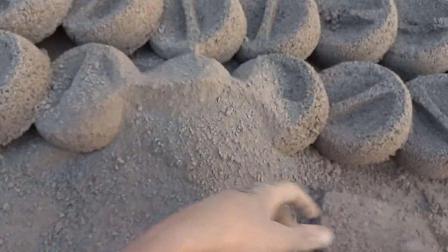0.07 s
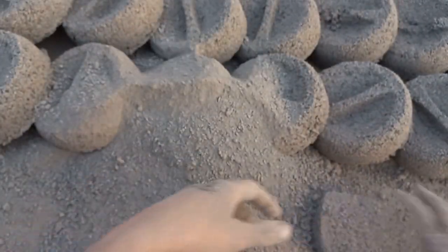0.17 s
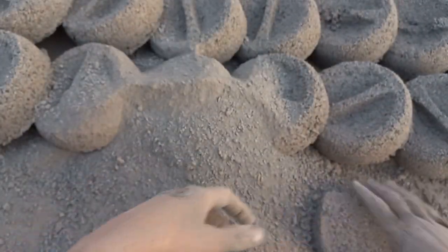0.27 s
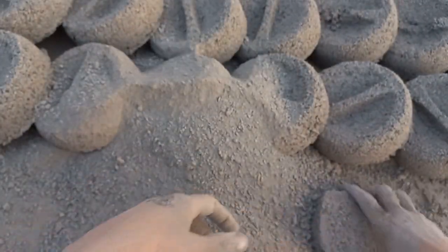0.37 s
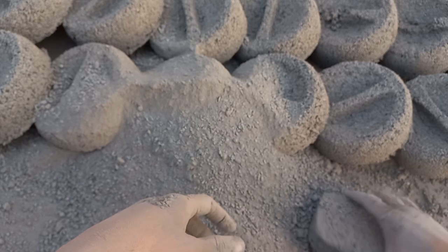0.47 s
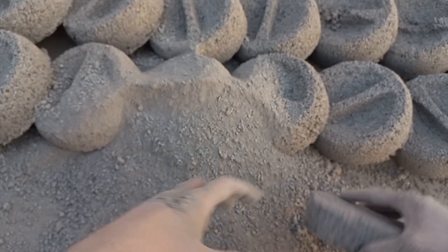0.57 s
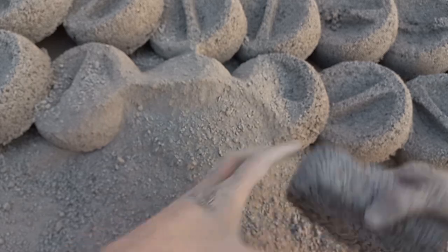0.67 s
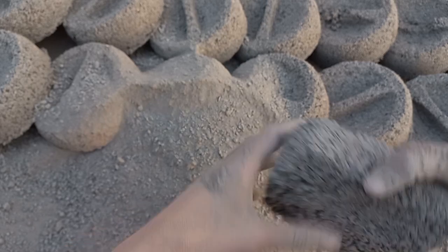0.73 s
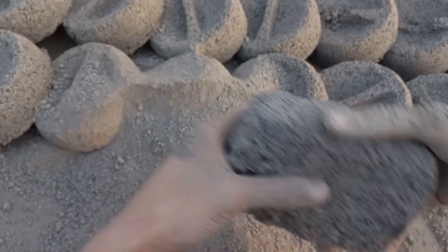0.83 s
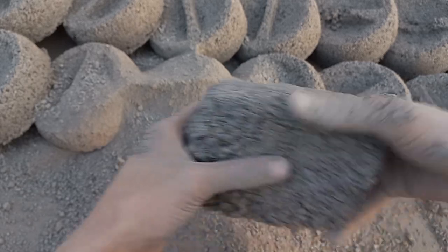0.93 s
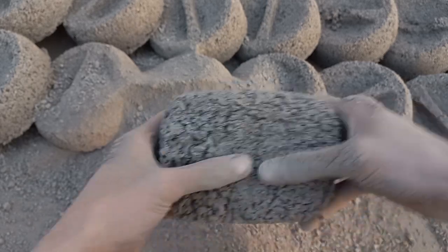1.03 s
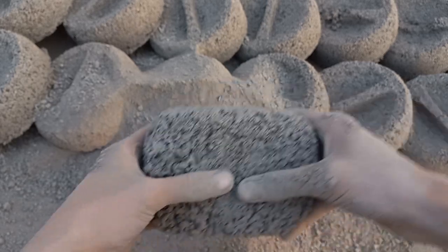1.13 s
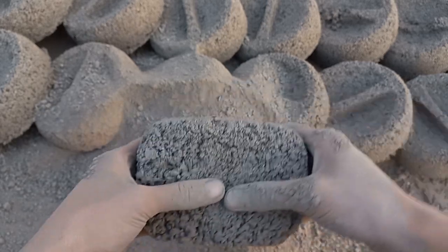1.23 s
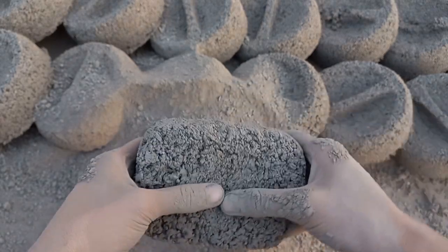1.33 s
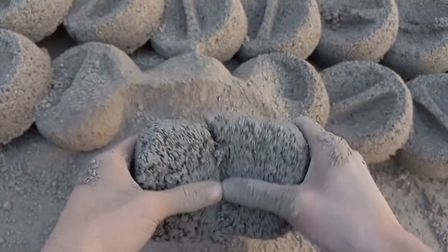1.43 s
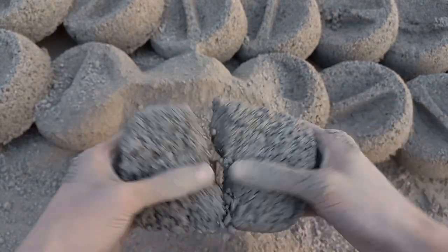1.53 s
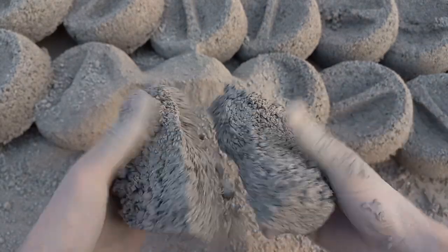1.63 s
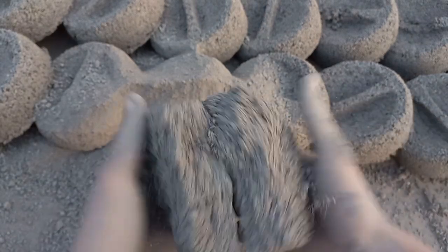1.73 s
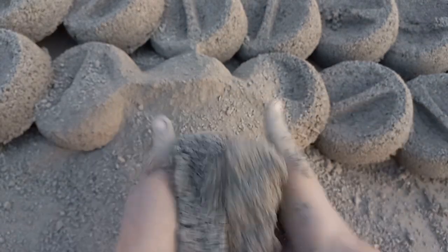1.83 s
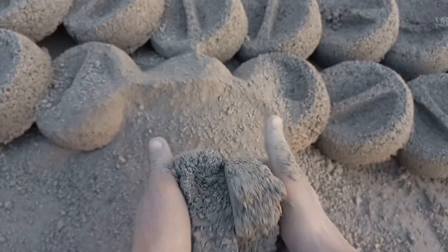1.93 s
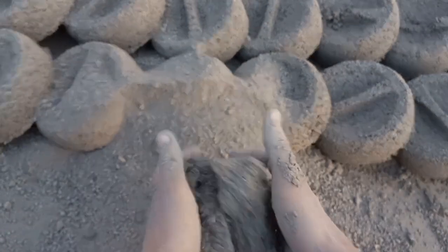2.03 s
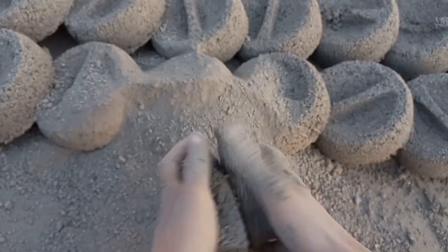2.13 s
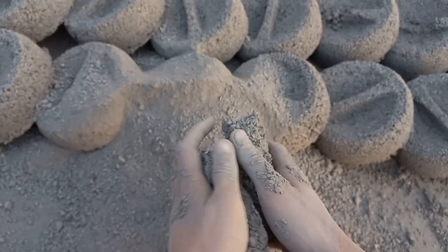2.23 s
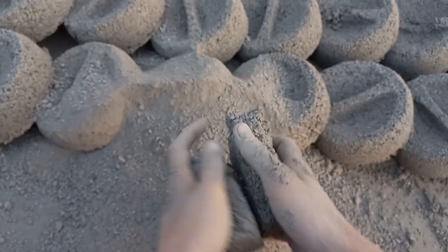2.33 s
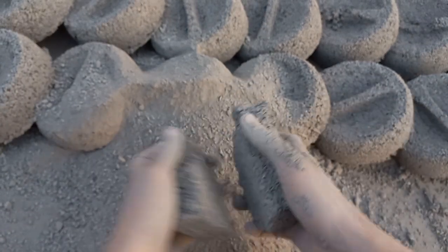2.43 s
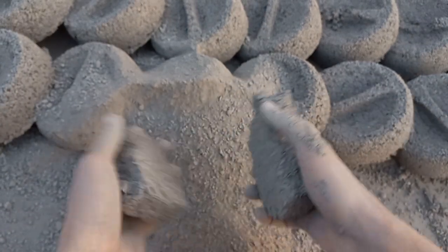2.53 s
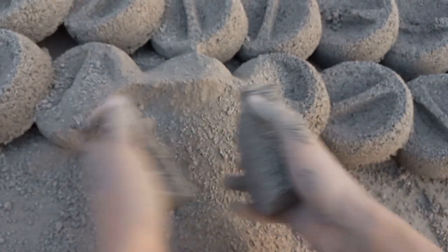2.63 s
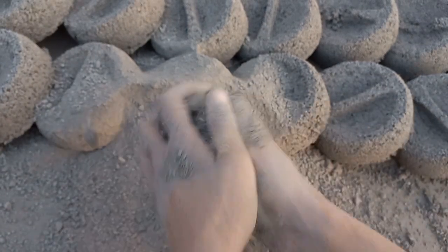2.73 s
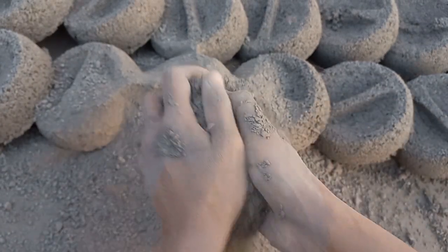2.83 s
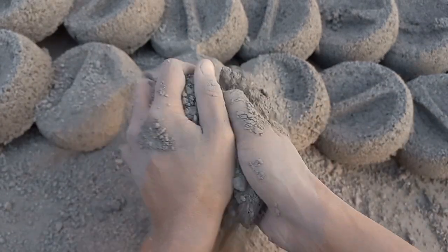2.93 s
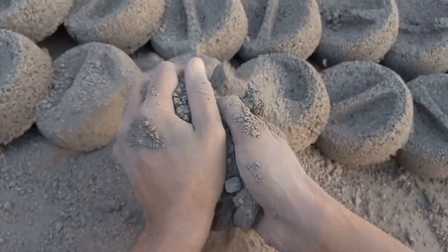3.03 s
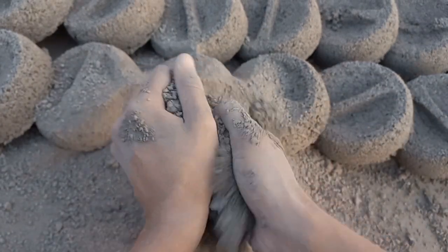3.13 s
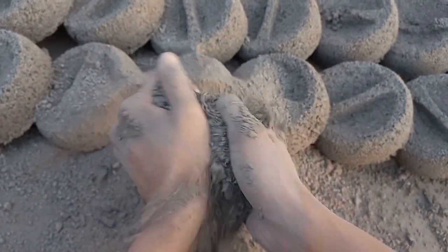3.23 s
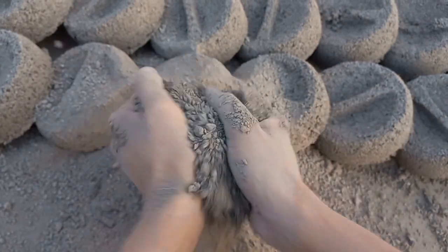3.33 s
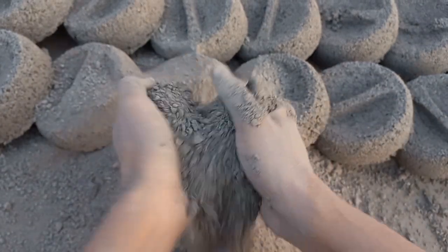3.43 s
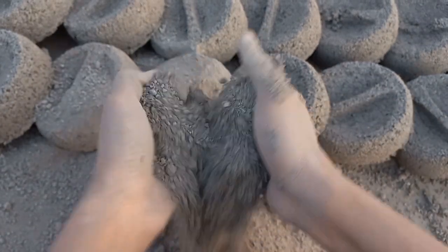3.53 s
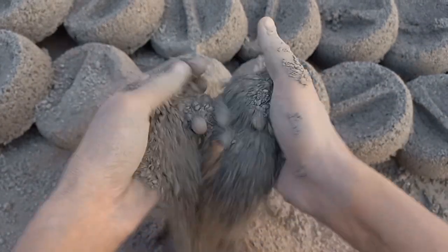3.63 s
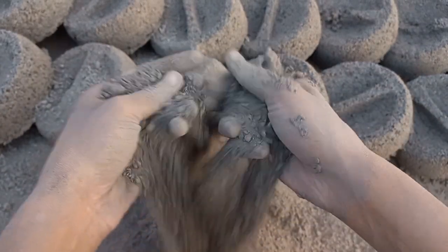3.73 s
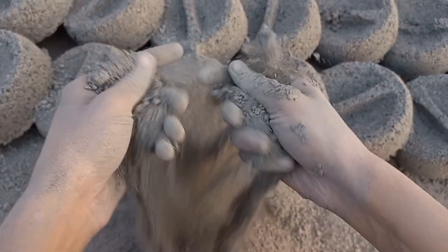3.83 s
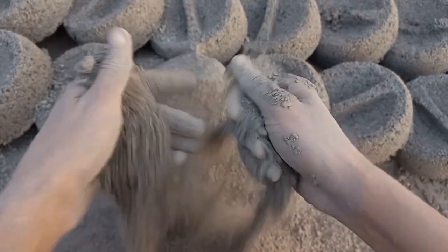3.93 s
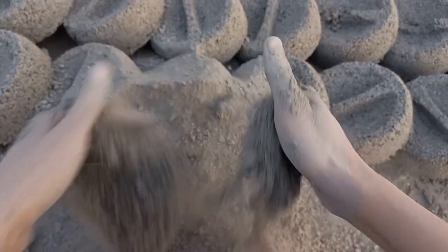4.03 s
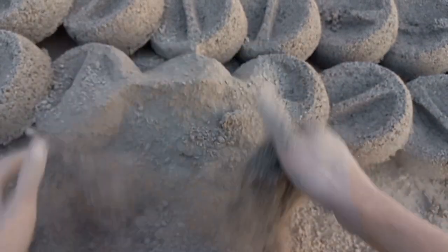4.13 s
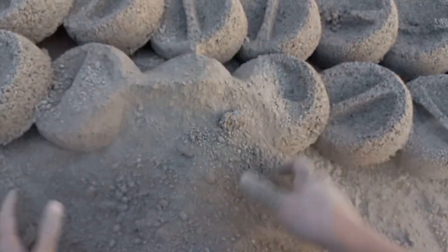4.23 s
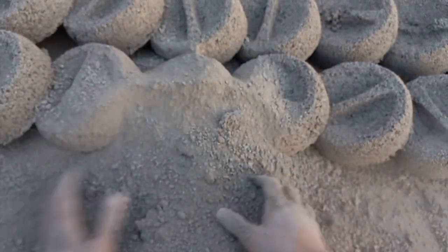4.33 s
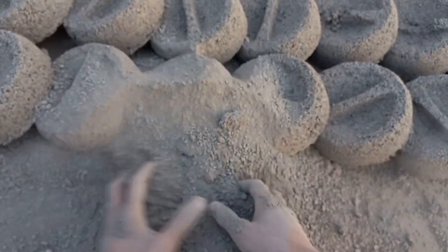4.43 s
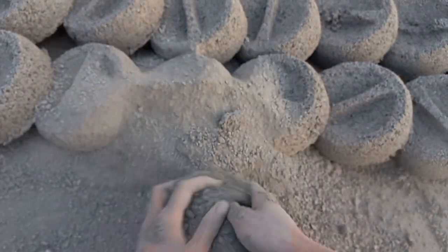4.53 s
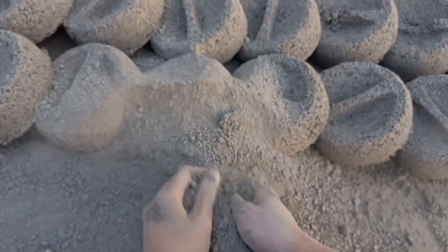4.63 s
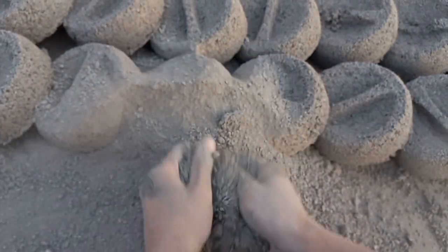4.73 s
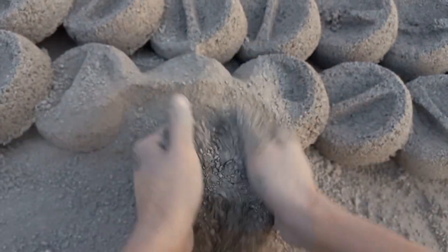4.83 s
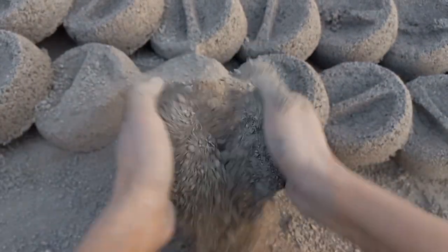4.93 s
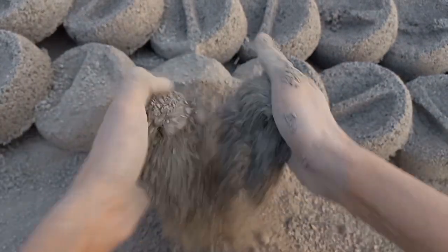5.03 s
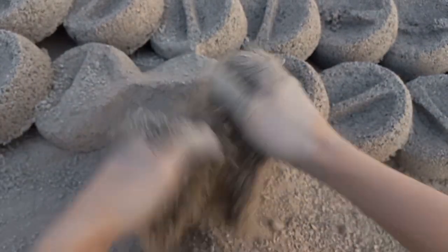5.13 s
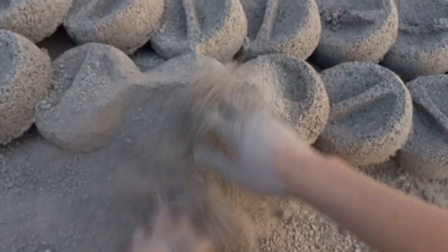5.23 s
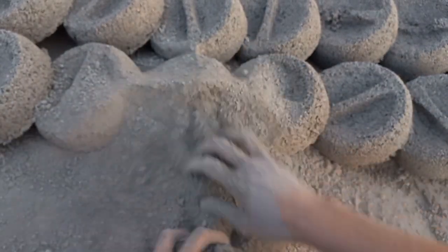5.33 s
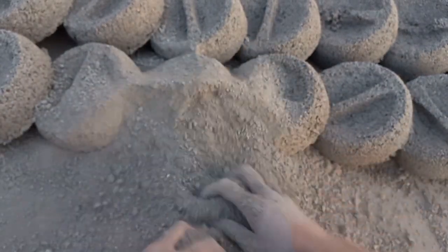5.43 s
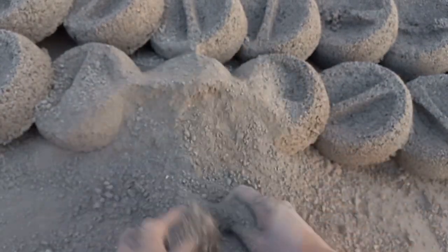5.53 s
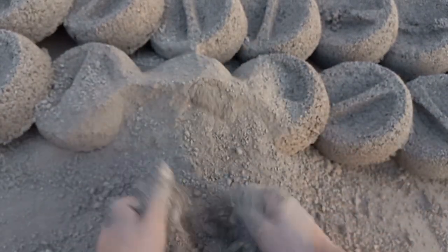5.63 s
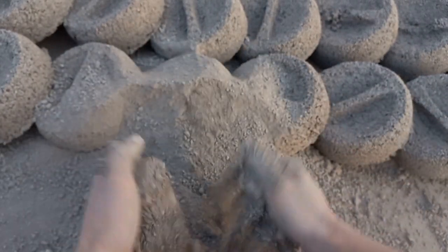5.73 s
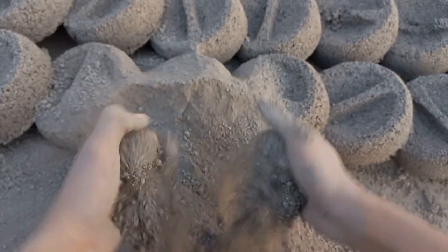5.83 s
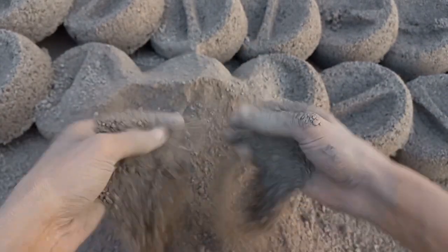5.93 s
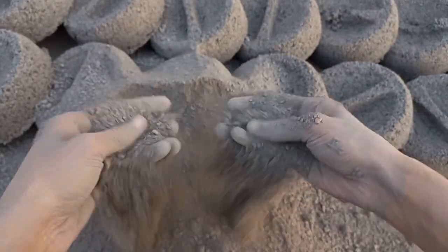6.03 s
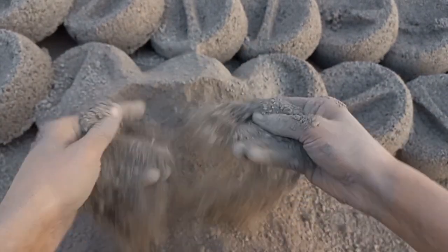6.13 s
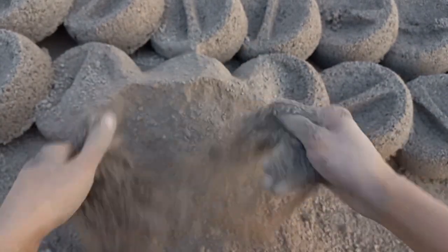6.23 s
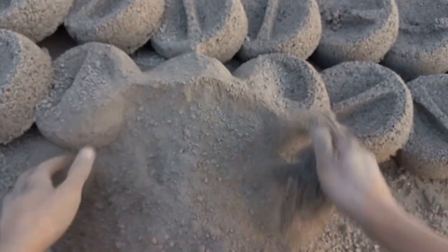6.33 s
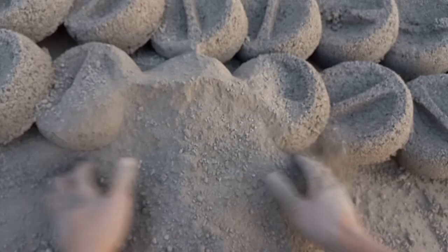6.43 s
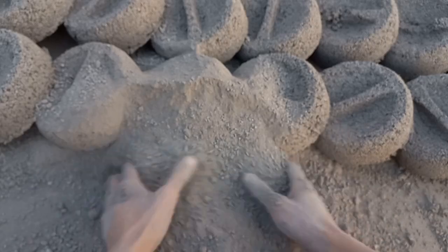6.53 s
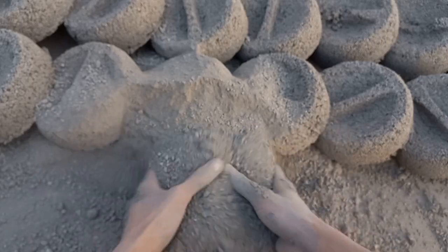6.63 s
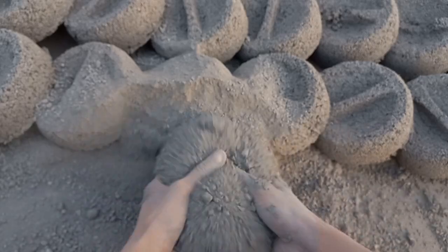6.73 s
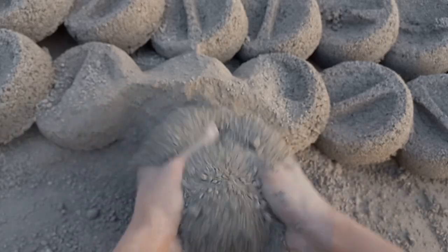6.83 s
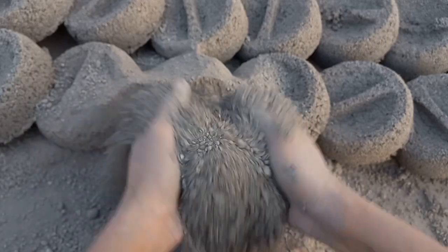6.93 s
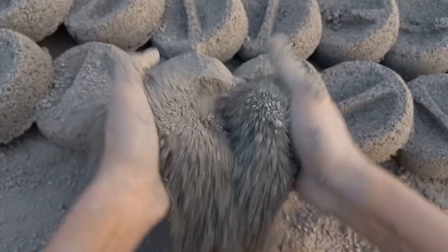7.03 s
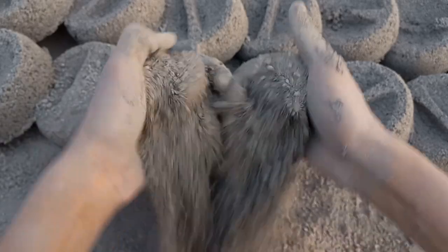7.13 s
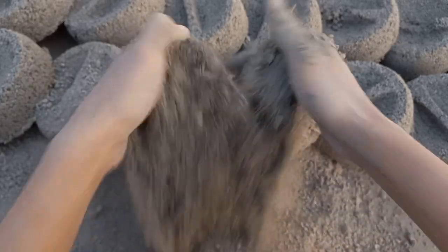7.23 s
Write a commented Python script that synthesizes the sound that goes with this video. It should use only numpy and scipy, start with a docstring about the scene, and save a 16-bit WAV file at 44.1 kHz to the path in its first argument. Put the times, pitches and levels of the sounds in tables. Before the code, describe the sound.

Close outdoors, bare hands snap a dry cement cake, crush it with gritty crunches, and spill grains onto a heap over faint traffic rumble.

```python
"""Outdoors, close by: bare hands snap a dry cement cake, crush it, scoop the grit and pour it onto a heap.
The material is four crowds of tiny damped grain rings over hiss, gated by the gestures of the hands.
Snaps are decaying tones with noise, a clap is a bank of air resonances, thuds are low damped tones.
Below lies filtered-noise rumble of distant traffic, with thumps from the digging hands;
behind are a far engine's wavering drone that fades, and a thin hiss."""
import sys
import numpy as np
from scipy import signal
from scipy.fft import rfft, irfft, next_fast_len
from scipy.io import wavfile
from scipy.ndimage import uniform_filter1d

SR = 44100
rng = np.random.default_rng(int(sys.argv[2]) if len(sys.argv) > 2 else 0)


def wav_record(signal):
    """Record a signal, one row per channel, as 16-bit PCM in the file named by sys.argv[1]."""
    frames = np.transpose(np.atleast_2d(signal))
    bounded = np.clip(frames, -1, 1)
    # unit amplitude maps onto the largest positive 16-bit level
    quanta = np.round(bounded * 32767).astype(np.int16)
    wavfile.write(sys.argv[1], SR, quanta)


N = 321489

# Spectral shapes of the four grain crowds. Each row: frequency in Hz, relative density in dB per Hz.
CRUSH_SPECTRUM = [(500, -31), (850, -9.5), (1050, -5), (1230, -7.5), (1400, -1.5), (1580, -6.5),
                  (1750, -2.5), (2050, -7.5), (2500, -6.5), (3100, -11.5), (4200, -14.5), (7000, -29)]
SCOOP_SPECTRUM = [(170, -15), (250, -6), (390, -17), (500, -6.5), (570, -4.5), (640, -2), (720, -7),
                  (800, -9.5), (1000, -10.5), (2000, -12.5)]
GRIT_SPECTRUM = [(2000, -4), (3300, -10), (4300, -9.5), (5500, -6), (6800, -3), (8300, -8), (10500, -25.5)]
DUST_SPECTRUM = [(7500, -7.5), (9800, -6.5), (11500, -6.5), (13200, -5), (14800, -6.5), (15700, -16),
                 (15900, -47)]
# Handfuls that crumble or spill. Each row: peak time in seconds, swell in seconds, fade in seconds,
# then peak levels before flicker: crushing in dB, pouring grit in dB, fine dust in dB.
SPILLS = [(0.042, 0.15, 0.026, -50, -48.5, -53.5), (0.414, .05, 0.034, -55.5, -53, -54),
          (0.516, 0.11, 0.052, -58, -59.5, -64), (0.601, 0.047, 0.046, -67, -58.5, -55),
          (0.846, 0.17, 0.1, -61.5, -56.5, -54), (1.033, 0.23, 0.064, -60.5, -54, -56),
          (1.429, 0.012, 0.022, -65, -62, -62), (1.499, 0.02, 0.014, -56, -49.5, -53),
          (1.579, 0.036, .035, -57.5, -57, -57), (1.736, 0.015, 0.013, -52, -55, -46),
          (1.808, 0.041, 0.047, -56, -49.5, -50), (1.865, 0.015, 0.085, -50.5, -46.5, -46),
          (1.95, 0.15, 0.2, -65, -50.5, -54), (2.118, 0.094, 0.037, -58.5, -54, -53),
          (2.212, .06, 0.031, -67, -53.5, -58), (2.33, 0.12, .05, -64.5, -55, -58),
          (2.429, 0.11, 0.03, -71, -59.5, -62), (2.752, 0.017, 0.15, -48, -50.5, -52.5),
          (2.883, 0.084, 0.13, -43.5, -45.5, -49.5), (3.173, 0.075, 0.069, -36.5, -39.5, -48),
          (3.345, 0.099, 0.12, -41.5, -44, -49.5), (3.03, 0.11, 0.12, -49, -58, -57),
          (3.562, 0.16, 0.11, -47, -51, -54.5), (3.84, 0.097, 0.28, -51, -55, -56),
          (4.01, .13, 0.06, -51.5, -53.5, -57), (4.128, 0.043, 0.055, -55.5, -51.5, -52.5),
          (4.238, 0.087, 0.045, -54.5, -48.5, -49.5), (4.38, 0.046, 0.13, -46, -51.5, -63),
          (4.665, 0.03, .09, -39.5, -61, -63), (4.76, .12, 0.16, -36, -45, -57),
          (4.88, 0.11, 0.13, -36.5, -40, -51.5), (5.09, 0.23, 0.076, -75, -59.5, -56),
          (5.3, 0.14, 0.058, -57, -44.5, -47.5), (5.712, 0.14, 0.11, -36, -37.5, -47),
          (6.136, .14, 0.19, -47, -46, -50), (6.343, 0.092, 0.036, -56, -50, -52.5),
          (6.465, 0.054, 0.12, -47.5, -45, -48), (6.95, 0.13, 0.18, -38.5, -47, -54.5)]
# Hands dig into the heap, dull and low. Each row: peak time in seconds, swell in seconds, fade in seconds,
# then peak levels before flicker: scooping in dB, crushing in dB.
DIGS = [(0.0, .1, 0.13, -64, -54), (1.971, 0.014, 0.043, -50, -55), (4.5, .12, 0.68, -48.5, -52.5),
        (5.15, 0.11, 0.15, -59.5, -73), (5.36, 0.11, 0.3, -49, -44.5), (5.58, 0.1, 0.14, -42, -37.5),
        (5.83, .15, 0.058, -48, -47.5), (6.52, 0.043, 0.11, -55, -40.5), (6.59, 0.1, 0.15, -41, -43),
        (6.72, 0.11, 0.13, -43, -71), (6.89, 0.1, 0.15, -41.5, -47.5)]
# Loose grains trickle between the handfuls. Each row: time in seconds, grit level before flicker in dB.
TRICKLE = [(0, -67.5), (1.1, -67), (1.7, -61.5), (2.4, -67), (2.62, -64.5), (2.72, -68), (2.95, -61),
           (3.1, -54), (3.4, -62), (4.3, -56.5), (4.5, -65), (5.15, -58), (5.45, -56), (5.85, -49.5),
           (5.93, -65), (6.7, -64.5), (6.85, -61), (7.1, -47), (7.29, -49.5)]
# How lumpy the material still is; powder flows evenly. Each row: time in seconds, share from 0 to 1.
LUMPINESS = [(0, 0.53), (2.5, 1), (3.5, 0.43), (4.3, 0.64), (4.6, 0.3), (5.3, 0.37), (6, 0.05),
             (7.29, 0.25)]
# The handling noise jumps in level at once, then eases back.
# Each row: time in seconds, level change in dB (negative = drop).
LEVEL_JUMPS = [(.358, 5.5), (1.478, 2), (1.53, 11), (1.565, -2), (1.853, 7), (2.731, 20), (3.1, 3),
               (3.207, 3.5), (3.29, 4), (4.031, 7.5), (4.335, 7), (6.405, 5)]
# The hollow between the hands favours one pitch.
# Each row: time in seconds, pitch in Hz, gain of the resonance in dB.
HOLLOW = [(0, 1610, -13), (2.5, 1640, 8), (2.8, 1520, -4), (4.33, 1350, -18.5), (4.57, 950, 4),
          (4.75, 1320, -10), (5.43, 1110, -4), (5.6, 1160, -2.5), (6.5, 1420, -24), (6.77, 665, 4.5),
          (6.93, 1170, -2.5), (7.29, 1310, -2.5)]
# Single snaps of crust and pebbles. Each row: nominal start in seconds, knock level in dB,
# knock pitch in Hz, splinter level in dB, sparkle level in dB (levels before the decay).
SNAPS = [(0.14, -27.5, 2320, -30, -52), (0.161, -44, 1030, -49, -61), (0.405, -41, 1010, -52, -49),
         (0.4137, -43, 1630, -37, -36), (0.4453, -39, 2250, -47, -61), (0.5268, -40, 1010, -43, -41),
         (0.6197, -45, 1090, -53, -40), (0.733, -43, 1840, -56, -43.5), (0.7537, -42, 2000, -53, -53),
         (0.8734, -51, 2440, -55, -38), (1.4256, -51, 2360, -47.5, -53), (1.4816, -41, 1720, -53, -52),
         (1.53, -44, 2010, -53, -41), (1.568, -42, 2540, -50, -49), (1.674, -47, 982, -46, -43),
         (1.733, -30.5, 1800, -33, -35), (1.8531, -43, 2680, -52, -41), (1.884, -30, 2700, -49, -32.5),
         (1.8905, -31, 1630, -41, -46), (1.9046, -33, 1430, -32, -46), (1.9447, -43, 950, -41, -41),
         (2.0701, -57, 1730, -48, -42), (2.121, -40, 1780, -38.5, -47), (2.1593, -36, 1790, -55, -53),
         (2.217, -48, 942, -47, -42), (2.3359, -34.5, 1770, -44, -53), (2.7544, -41, 1360, -51, -45),
         (2.911, -40, 1790, -37, -41), (3.1026, -38, 1750, -38, -41), (3.208, -25, 1800, -41, -50),
         (3.5557, -44, 1340, -42, -41), (4.0321, -31.5, 1340, -37, -45), (4.2337, -35.5, 1690, -37, -48),
         (4.259, -44, 1170, -37, -41), (4.6478, -26, 1180, -44, -55), (4.819, -22.5, 1420, -36, -46),
         (4.884, -28, 1420, -40, -51), (5.1013, -61, 890, -41, -35), (5.3136, -31, 1380, -33, -35),
         (5.451, -27, 1350, -42, -37), (5.591, -21, 1400, -40, -39), (5.7426, -22, 2520, -18.5, -18),
         (5.8503, -33, 1430, -48, -50), (6.8592, -28, 1040, -47, -67), (7.095, -29.5, 1720, -38, -45)]
# Cupped palms clap shut on the lumps. The one row: time in seconds, overall gain in dB.
CLAP = (2.7316, 5.5)
# Resonances of the trapped air. Each row: frequency in Hz, relative level in dB, 60 dB decay in seconds.
CUP_MODES = [(1040, -39, 0.04), (1484, -8.5, 0.017), (1716, -5.5, 0.012), (2050, -20, 0.016),
             (4960, -12, 0.0017), (8100, -13.5, 0.0014), (12000, -19, 0.0014)]
# Soft lumps land on the heap. Each row: start in seconds, level before decay in dB, pitch in Hz,
# 60 dB decay in seconds.
THUDS = [(1.961, -48, 596, 0.016), (1.975, -33, 483, 0.024), (1.987, -49, 325, 0.019),
         (3.356, -32, 94, 0.069), (5.314, -23, 115, 0.066)]
# Spectral shapes of the low rumble, of heavy vehicles and of outdoor hiss.
# Each row: frequency in Hz, relative density in dB per Hz.
RUMBLE_SPECTRUM = [(47, -26), (80, -10), (141, -1), (294, -11), (320, -12.5), (389, -18.5), (479, -20),
                   (598, -21), (651, -20.5), (864, -26), (930, -25), (1500, -39), (1950, -73), (3300, -120)]
HEAVY_SPECTRUM = [(30, -40), (42, -29), (55, -15.5), (70, -10.5), (90, -6.5), (120, -29)]
AIR_SPECTRUM = [(700, -15), (1500, -28), (3000, -10), (6500, 11.5), (10000, 11.5), (14000, -27),
                (15700, -23), (15900, -55)]
# Levels of the low rumble: distant traffic, with thumps from the digging hands.
# Each row: time in seconds, level before wander in dB.
RUMBLE_LEVEL = [(0.0, -45.5), (0.1, -48.5), (1.24, -51), (1.54, -54), (1.83, -51), (2.35, -52),
                (3.84, -52.5), (4.0, -49), (4.32, -51), (4.95, -47), (5.16, -54), (5.42, -45), (5.7, -49),
                (6.48, -50), (6.76, -45), (7.29, -50)]
# Levels of the heavy vehicles. Each row: time in seconds, level in dB.
HEAVY_LEVEL = [(0, -48), (.35, -68), (.83, -57), (1.24, -69), (1.8, -52.5), (2.13, -55), (2.4, -62),
               (4.8, -69), (5, -55.5), (6.0, -65), (6.5, -59), (7.29, -67)]
# A far engine drones. Each row: time in seconds, mean pitch in Hz, level before wander and fade in dB.
DRONE = [(0.0, 135.8, -47.5), (0.626, 136.5, -47), (1.162, 136.5, -72), (1.208, 133.6, -48.5),
         (1.4, 123.7, -61)]

SWELL_DB, ROUNDNESS = 12, 1.284  # fall over one swell or fade; 1 = pointed peak, 2 = rounded top
SCOOP_UNDER_CRUSH_DB = -11  # every crushed handful also stirs the heap
TRICKLE_CRUSH_DB, TRICKLE_SCOOP_DB, TRICKLE_DUST_DB = -9, -8, -2  # relative to the grit
JUMP_EASE_S, SNAP_T60_S = 0.014, 0.0076
AIR_DB = -73.5
EDGE_HZ = 16800


def handling():
    """Amplitude modulation: clumped release makes all crowds flicker together, and each a little alone."""
    lumpy = np.clip(curve(LUMPINESS, axis=1), 0, 1)
    clumps = lumpy * (0.71 * wander(44) + 0.68 * wander(120))
    listed, small = level_jumps(lumpy, per_s=53, jump_db=4.5, ease_s=0.00099)
    crushing, scooping, pouring, dusting = effort()

    crush = hollow(grains(CRUSH_SPECTRUM, per_s=1200, spread_db=2.0, turns=2.23, bed_db=4.0))
    crush *= crushing * amp(1.3 * clumps + 1.3 * wander(17))
    scoop = grains(SCOOP_SPECTRUM, per_s=800, spread_db=0.5, turns=1.75, bed_db=0.5)
    scoop *= scooping * amp(0.6 * clumps + 0.2 * wander(22))
    grit = grains(GRIT_SPECTRUM, per_s=3600, spread_db=3.5, turns=2.1, bed_db=1.0)
    grit *= pouring * amp(2.9 * clumps + 1.45 * wander(22))
    dust = grains(DUST_SPECTRUM, per_s=5500, spread_db=3.5, turns=1.7, bed_db=-3.0)
    dust *= dusting * amp(3.3 * clumps + 1.0 * wander(30))

    jumping = amp(0.22 * small) * crush + amp(small) * (grit + dust)  # coarse lumps jump less
    return patchy(scoop + amp(listed) * jumping, patchy_db=0.5)


def grains(points, per_s, spread_db, turns, bed_db, count=8):
    """Shot noise: grains of several sizes each ring a few turns; countless small ones blur into hiss."""
    clicks = np.zeros(N)
    for hz in np.geomspace(points[1][0], points[-2][0], count):
        t = np.arange(1, 300) / SR * hz / turns  # time in units of `turns` periods
        phase = 2 * np.pi * rng.random()
        ring = t * np.exp(-3 * t) * np.cos(2 * np.pi * turns * t + phase)
        struck = rng.random(N) < per_s / count / SR
        size = np.minimum(rng.exponential(1, N), 5)
        train = struck * amp(spread_db * size) * rng.choice([-1., 1.], N)
        clicks += np.sqrt(hz) * signal.oaconvolve(train, ring / np.linalg.norm(ring))[:N]
    flat_band = [(points[0][0], 0), (points[-1][0], 0)]
    bed = coloured(rng.standard_normal(N), flat_band)
    return coloured(evened(clicks) + amp(bed_db) * bed, points)


def hollow(crush):
    """Cavity resonance: the space between the hands reinforces one moving pitch."""
    stirred = crush + 0.76 * coloured(rng.standard_normal(N), SCOOP_SPECTRUM)
    cavity = resonate(stirred, curve(HOLLOW, axis=1), width=550)
    return evened(crush + amp(curve(HOLLOW, axis=2)) * cavity)


def resonate(x, hz, width):
    """Heterodyne filtering: the moving pitch shifts to zero, is smoothed and shifts back, at gain 1."""
    turn = np.exp(2j * np.pi * np.cumsum(hz) / SR)
    r = np.exp(-np.pi * width / SR)  # width in Hz
    return 2 * (turn * signal.lfilter([1 - r], [1, -r], x / turn)).real


def effort():
    """Energy addition: powers of handfuls, digs and trickle sum, and their roots are the crowd gains."""
    trickle = amp(2 * curve(TRICKLE, axis=1))
    crushed = strokes(SPILLS, axis=3)
    crush = crushed + strokes(DIGS, axis=4) + amp(2 * TRICKLE_CRUSH_DB) * trickle
    scoop = amp(2 * SCOOP_UNDER_CRUSH_DB) * crushed + strokes(DIGS, axis=3)
    scoop += amp(2 * TRICKLE_SCOOP_DB) * trickle
    grit = strokes(SPILLS, axis=4) + trickle
    dust = strokes(SPILLS, axis=5) + amp(2 * TRICKLE_DUST_DB) * trickle
    return np.sqrt([crush, scoop, grit, dust])


def strokes(rows, axis):
    """Energy envelope: the power of each gesture swells to a peak and dies away, and all powers add."""
    rows = np.array(rows)
    t = np.arange(N // 32 + 2)[:, None] * 32 / SR
    peak_s = rows[:, 0]
    flank_s = np.where(t < peak_s, rows[:, 1], rows[:, 2])
    away = abs(t - peak_s) / np.maximum(flank_s, .005)
    level_db = rows[:, axis] - SWELL_DB * np.minimum(away, 4) ** ROUNDNESS
    power = amp(2 * level_db).sum(axis=1)
    return np.interp(np.arange(N) / SR, t[:, 0], power)


def level_jumps(lumpy, per_s, jump_db, ease_s):
    """Step and relaxation: the level in dB jumps at once and eases back, as listed and at random."""
    jumps = jump_db * np.minimum(rng.exponential(1, N), 2)
    kicks = (rng.random(N) < per_s / SR) * jumps
    small = signal.lfilter([1], [1, -np.exp(-1 / (ease_s * SR))], kicks)
    listed = np.zeros(N)
    for s, db in LEVEL_JUMPS:
        add(listed, s, np.linspace(db, 0, round(JUMP_EASE_S * SR)))
    return listed, lumpy * (small - small.mean())


def patchy(x, patchy_db):
    """Random spectral shading: chance makes the colour drift in small patches of pitch and time."""
    z = signal.stft(x, nperseg=512, noverlap=384)[2]
    field = rng.standard_normal(z.shape[::-1])  # time by frequency
    field = uniform_filter1d(field, size=16, axis=0)
    field = evened(uniform_filter1d(field, size=4, axis=1)).T
    return signal.istft(z * amp(patchy_db * field), nperseg=512, noverlap=384)[1][:N]


def snaps():
    """Brittle fracture: a damped knock with splinter and sparkle noise, gone within milliseconds."""
    out, t = np.zeros(N), np.arange(900) / SR
    noise = rng.standard_normal((len(SNAPS), len(t)))
    noise[:, 4] = 6  # one sharp crack within the noise
    mid_band = signal.butter(2, [2800, 8000], "bandpass", fs=SR, output="sos")
    top_band = signal.butter(5, [8000, 15000], "bandpass", fs=SR, output="sos")
    mid, top = signal.sosfilt(mid_band, noise), signal.sosfilt(top_band, noise)
    fall = amp(-60 * t / SNAP_T60_S) * (1 - np.exp(-t / .00008))
    for (s, knock_db, knock_hz, splinter_db, sparkle_db), splinter, sparkle in zip(SNAPS, mid, top):
        knock = amp(knock_db) * np.sin(2 * np.pi * knock_hz * t)
        shards = amp(splinter_db) * evened(splinter) + amp(sparkle_db) * evened(sparkle)
        add(out, s + 0.00082, fall * (knock + shards))
    return out


def clap():
    """Cavity modes: closing palms set trapped air ringing, which bounces between hands and ground."""
    out, t = np.zeros(N), np.arange(2000) / SR
    start_s, gain_db = CLAP
    ring = sum(amp(db - 60 * t / t60) * np.sin(-2 * np.pi * hz * t) for hz, db, t60 in CUP_MODES)
    ring *= amp(gain_db) * (1 - np.exp(-(t / .0004) ** 2))  # the palms close within a millisecond
    no_bass = signal.butter(1, 500, "highpass", fs=SR, output="sos")  # small palms push no bass
    ring = signal.sosfilt(no_bass, ring)
    for bounce in range(3):
        add(out, start_s + 0.00307 * bounce, amp(-11.5 * bounce) * ring)
    return out


def thuds():
    """Damped oscillation: a soft push that swings at its pitch and dies away."""
    out, t = np.zeros(N), np.arange(6000) / SR
    for s, db, hz, t60 in THUDS:
        onset = 1 - np.exp(-t * hz / 0.5)
        add(out, s, amp(db - 60 * t / t60) * onset * np.sin(2 * np.pi * hz * t))
    return out


def low_rumble():
    """Filtered noise: distant traffic with thumps from the digging hands, and heavy vehicles."""
    level = amp(curve(RUMBLE_LEVEL, axis=1) + 0.4 * wander(7.6))
    rumble = coloured(rng.standard_normal(N), RUMBLE_SPECTRUM) * level
    heavy = coloured(rng.standard_normal(N), HEAVY_SPECTRUM) * amp(curve(HEAVY_LEVEL, axis=1))
    return rumble + heavy


def far_engine():
    """Frequency modulation: a drone wavers in pitch and level, then fades."""
    pitch_hz = curve(DRONE, axis=1) + 3.04 * wander(8.4)
    drone = np.sin(2 * np.pi * np.cumsum(pitch_hz) / SR)
    fade_s = DRONE[-1][0]
    fade = np.interp(np.arange(N) / SR, [fade_s, fade_s + 0.94], [1, 0])
    return drone * fade * amp(curve(DRONE, axis=2) + 0.7 * wander(9.9))


def outdoor_hiss():
    """Stationary noise: a thin hiss of fixed colour and level."""
    return amp(AIR_DB) * coloured(rng.standard_normal(N), AIR_SPECTRUM)


def amp(db):
    """Logarithmic level: decibels to gain."""
    return 10 ** (np.asarray(db) / 20)


def evened(x):
    """Normalisation: scales to rms 1."""
    return x / np.sqrt(np.mean(x ** 2) + 1e-20)


def read(points, hz):
    """Logarithmic pitch: interpolates a spectrum in log frequency, -90 dB outside it."""
    f, value = np.transpose(points)
    return np.interp(np.log(hz + 1), np.log(f + 1), value, -90, -90)


def curve(rows, axis):
    """Linear interpolation: one column of a table, sample by sample."""
    rows = np.array(rows)
    return np.interp(np.arange(N) / SR, rows[:, 0], rows[:, axis])


def coloured(x, points):
    """Spectral shaping: multiplies the spectrum by a curve and scales the result to rms 1."""
    size = next_fast_len(N)
    gain = amp(read(points, np.fft.rfftfreq(size, 1 / SR)))
    return evened(irfft(rfft(x, size) * gain, size)[:N])


def wander(hz):
    """Low-passed noise: slow chance variation up to about a given rate, rms 1."""
    step = rng.standard_normal(N // 32 + 2)
    slow = signal.sosfiltfilt(signal.butter(1, hz, fs=SR / 32, output="sos"), step)
    return evened(np.interp(np.arange(N) / 32, np.arange(len(step)), slow))


def add(mix, s, sound):
    """Superposition: mixes a sound in at a time in seconds."""
    part = mix[round(s * SR):][:len(sound)]
    part += sound[:len(part)]


def scene():
    """Superposition: the hands and their events over the background."""
    hands = handling() + snaps() + clap() + thuds()
    return (hands + low_rumble() + far_engine() + outdoor_hiss())[None]


def record(dry):
    """Band limitation: the small microphone drops the lowest bass, then the treble is cut off."""
    thin = signal.sosfilt(signal.butter(3, 55, "highpass", fs=SR, output="sos"), dry)
    low_pass = signal.firwin(511, EDGE_HZ, window=("kaiser", 9), fs=SR)
    return signal.oaconvolve(thin, low_pass[None], "same")


dry = scene()
out = record(dry)
wav_record(out)
```